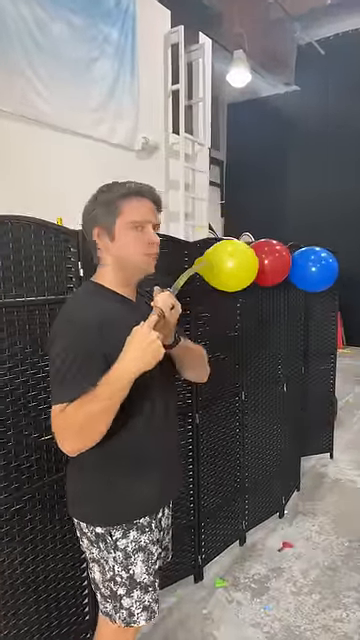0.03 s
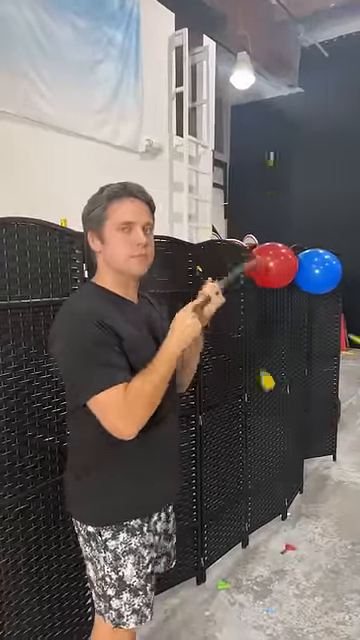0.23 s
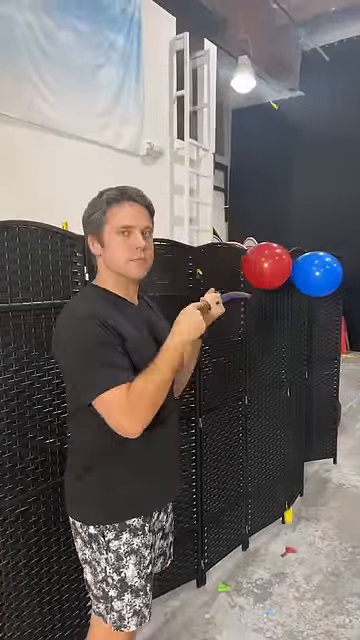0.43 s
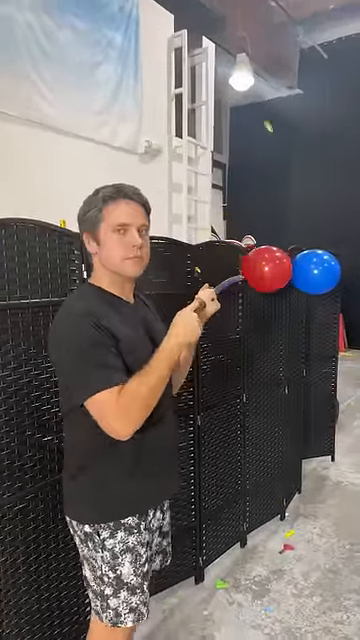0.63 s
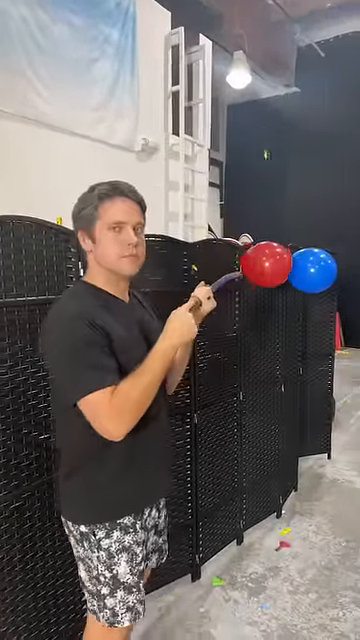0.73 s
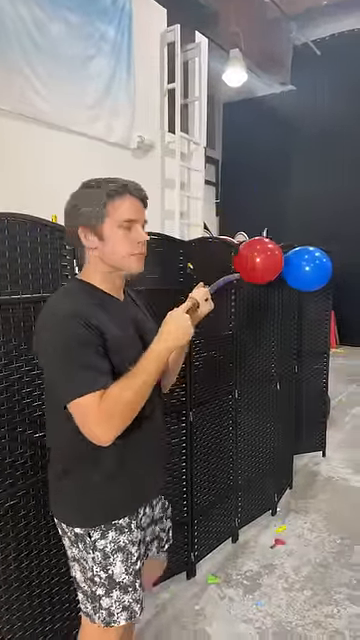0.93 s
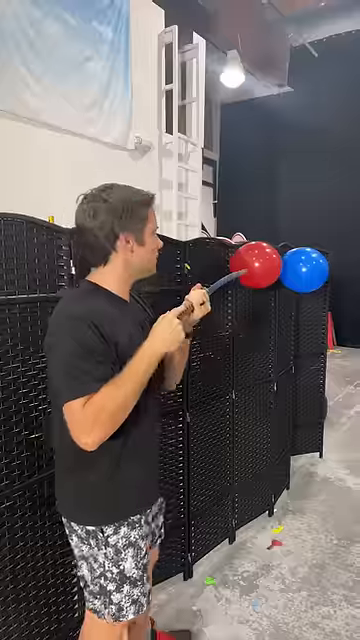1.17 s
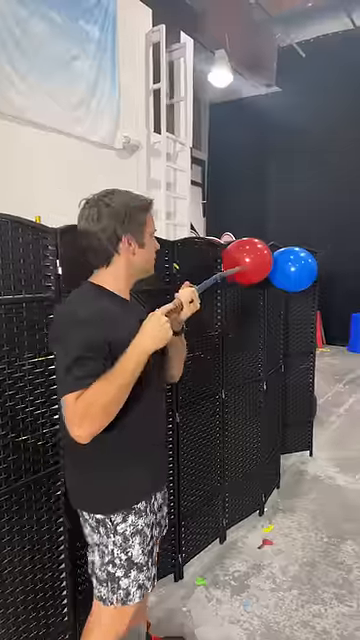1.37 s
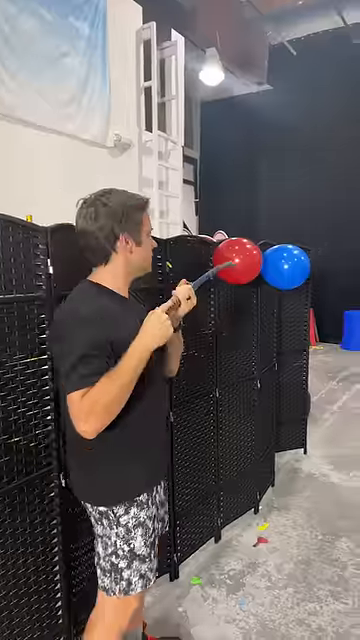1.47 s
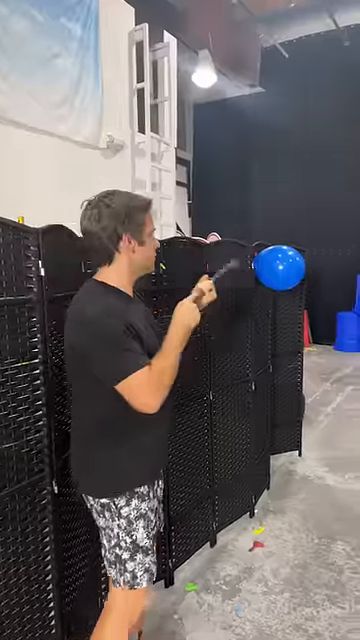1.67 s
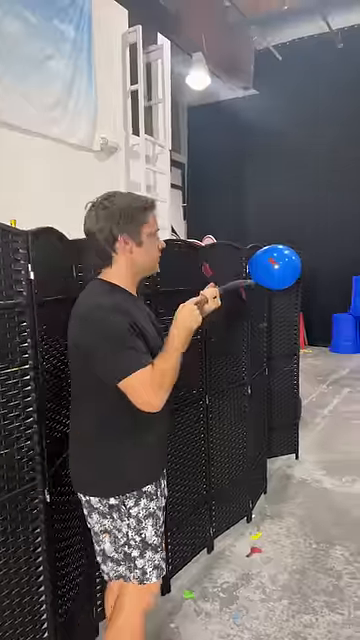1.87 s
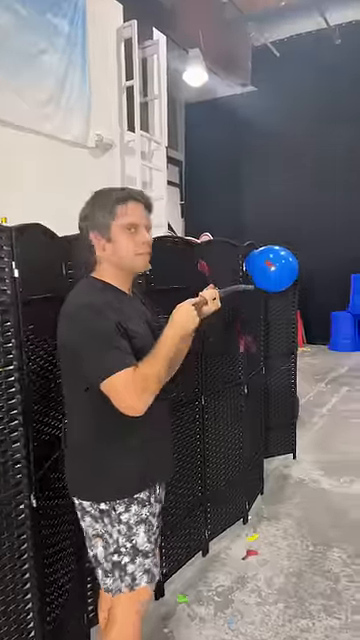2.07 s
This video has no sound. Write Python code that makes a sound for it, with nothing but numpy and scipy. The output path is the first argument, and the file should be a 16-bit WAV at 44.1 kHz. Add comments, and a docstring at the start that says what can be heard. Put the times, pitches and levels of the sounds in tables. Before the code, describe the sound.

Two balloons burst one after the other, with long echoes in a big room.

```python
"""A faint mains hum fills a large, hard hall; then two party balloons are pricked, a few steps away.
Each skin splits, rips in about ten milliseconds and lets its air thump outward. Near walls slap
the bang back and the hall rings on. Between the two bursts come a small flick and a faint rustle.
The recorder turns itself down at each bang and slowly comes back up."""
import sys
import numpy as np
from scipy import signal
from scipy.fft import rfft, irfft, next_fast_len
from scipy.io import wavfile
from scipy.ndimage import uniform_filter1d, minimum_filter1d, map_coordinates

SR = 44100
rng = np.random.default_rng(int(sys.argv[2]) if len(sys.argv) > 2 else 0)


def dump(signal):
    """Clip the signal to [-1, 1] and save it as 16-bit WAV at the path in sys.argv[1]."""
    limited = np.clip(np.atleast_2d(signal).T, -1, 1)
    pcm = np.round(limited * 32767).astype(np.int16)
    wavfile.write(sys.argv[1], SR, pcm)


N = 92610

# The two bursts, one row per balloon. Columns: start_s, rip_length_s, rip_db, split_db,
# thump_hz, thump_db, floor_db, scatter_db, hall_db
BALLOONS = [(0.2285, 0.006, -2, -17.5, 407, -13, -19.5, -11, -7),
            (1.7042, 0.0081, -5, -28, 231, 0.5, -14, -14, -13)]
RIP_RISE_S, RIP_FADE_S = 0.00099, 0.015  # every fade time is the time taken to drop by 60 dB
NEAR_ECHO_FADE_S = 0.023


def amp(db):
    """Turn decibels into a number to multiply by."""
    return 10 ** (np.asarray(db) / 20)


def along(points, hz):
    """Read between (pitch_hz, value) points on a logarithmic pitch scale."""
    pitches, values = np.transpose(points)
    return np.interp(np.log(hz + 1), np.log(pitches + 1), values)


def since(start_s):
    """Seconds since start_s, for every sample; negative before it."""
    return np.arange(N) / SR - start_s


def filtered(sound, gain_at):
    """Scale each frequency in a sound by gain_at(hz)."""
    size = next_fast_len(N + 8192)
    hz = np.fft.rfftfreq(size, 1 / SR)
    return irfft(rfft(sound, size) * gain_at(hz), size)[:N]


def noise(colour, strength=1):
    """Noise of average (rms) size 1; its colour says how strong each pitch is next to the others."""
    hiss = strength * rng.standard_normal(N)
    shaped = filtered(hiss, lambda hz: amp(along(colour, hz)))
    return shaped / shaped.std()


def wobble(turns_per_s):
    """A smooth curve through random points."""
    return map_coordinates(rng.standard_normal(N // 8), [np.arange(N) * turns_per_s / SR], mode="wrap")


def lumpy_noise(colour, lumps_per_s, depth_db):
    """Noise that comes in random lumps."""
    return noise(colour, strength=amp(depth_db * wobble(lumps_per_s)))


def fade(t, fade_s):
    """Stay at 1 until t = 0, then die away."""
    return np.exp(-np.log(1000) * np.maximum(t, 0) / fade_s)


def swell(start_s, rise_s, length_s, fade_s):
    """Rise, hold until length_s after the start, then die away."""
    t = since(start_s)
    return np.clip(t / rise_s, 0, 1) * fade(t - length_s, fade_s)


def hum_and_air():
    """Mains electricity hums over the low murmur of the air."""
    # The steady tones of the hum. Columns: pitch_hz, level_db
    hum_tones = [(59.2, -57.5), (118.4, -62), (236.9, -79), (355.3, -81)]
    # The colour of the murmuring air. Columns: pitch_hz, level_db
    air_colour = [(20, -13), (60, -2), (140, 1), (300, -5.5), (600, -20.5), (1200, -27.5), (4000, -46.5),
                  (10000, -44), (12500, -58), (16000, -65.5)]
    hum = sum(amp(db) * np.sqrt(2) * np.sin(2 * np.pi * (hz * since(0) + rng.random()))
              for hz, db in hum_tones)
    return hum + amp(-66) * noise(air_colour)


def burst(start_s, length_s, rip_db, split_db, thump_hz, thump_db, rip_colour):
    """The skin splits, then rips apart in jerks; the freed air swings back and forth a few times."""
    # The colour of the first split in the rubber. Columns: pitch_hz, level_db
    split_colour = [(30, -31), (200, -3), (600, 5), (2500, -5.5), (5500, 0), (8200, -9), (9500, -18.5),
                    (16000, -36)]
    t = since(start_s)
    # A backwards fade: the split grows, then runs for 5 ms before the skin lets go.
    growth = fade(-since(start_s - 0.005), fade_s=0.024)
    split = growth * (t < 0) * noise(split_colour)
    jerks = lumpy_noise(rip_colour, lumps_per_s=500, depth_db=2)
    rip = swell(start_s, RIP_RISE_S, length_s, RIP_FADE_S) * jerks
    air_swing = np.sin(2 * np.pi * thump_hz * t)
    thump = swell(start_s, rise_s=0.0057, length_s=0.0057, fade_s=0.038) * air_swing
    return amp(split_db) * split + amp(rip_db) * rip + amp(thump_db) * thump


def floor_bounce(start_s, colour, delay_s=0.0051):
    """The floor and the screens beside the balloon echo just behind the rip."""
    return swell(start_s + delay_s, RIP_RISE_S, length_s=0.015, fade_s=NEAR_ECHO_FADE_S) * noise(colour)


def scatter(start_s, colour, delay_s=0.0097):
    """Many early echoes from the walls and ceiling arrive in a lumpy cluster."""
    loudness = swell(start_s + delay_s, rise_s=0.022, length_s=0.0543, fade_s=NEAR_ECHO_FADE_S)
    return loudness * lumpy_noise(colour, lumps_per_s=1500, depth_db=1)


def wall_slaps():
    """Single walls throw the crack of each rip back."""
    # Separate wall echoes. Columns: balloon_index, delay_s, level_db (next to the rip), length_s
    wall_echoes = [(0, .0205, -0.5, .003), (0, .033, -5, 0.0049), (0, 0.069, -5, .003),
                   (0, 0.081, -4, 0.0013), (1, .02, -8.5, .004), (1, 0.073, -6, .001)]
    # The colour of a crack coming off a wall. Columns: pitch_hz, level_db
    slap_colour = [(30, -21), (150, -8.5), (500, 12.5), (1300, -1), (3300, -4.5), (4500, 5), (6000, -4),
                   (7800, -13.5), (10300, -17.5), (12300, -29), (16000, -30)]
    loudness = np.zeros(N)
    for balloon, delay_s, level_db, length_s in wall_echoes:
        start_s, _, rip_db = BALLOONS[round(balloon)][:3]
        loudness += amp(rip_db + level_db) * swell(start_s + delay_s, RIP_RISE_S, length_s, RIP_FADE_S)
    return loudness * noise(slap_colour)


def hall_ring(start_s, colour, delay_s=0.021, rise_s=0.033):
    """Countless echoes blend into the ring of the hall; the highest pitches die first."""
    # How long the hall rings at each pitch. Columns: pitch_hz, fade_s
    ring_times = [(60, 1.3), (200, 0.87), (420, 1.177), (640, 1.288), (900, 1.168), (1500, 1.293),
                  (3500, 1.24), (6000, 1.165), (10000, 0.76), (15000, .5)]
    hz, t, bands = signal.stft(noise(colour), SR, nperseg=512)
    fading_bands = bands * fade(t - start_s, along(ring_times, hz)[:, None])
    ring = signal.istft(fading_bands, SR, nperseg=512)[1][:N]
    return ring * np.clip(since(start_s + delay_s) / rise_s, 0, 1)


def far_echoes(start_s, width_octaves=0.8):
    """The ceiling sends back a blurred boom, and the far wall a dull swell."""
    # Echoes off big, far surfaces. Columns: delay_s, rise_s, fade_s, level_db (next to the ring), pitch_hz
    surfaces = [(.048, 0.0034, 0.044, -3, 270), (.42, 0.013, 1, -28, 537)]
    echoes = np.zeros(N)
    for delay_s, rise_s, fade_s, level_db, pitch_hz in surfaces:
        hiss = rng.standard_normal(N)
        rumble = filtered(hiss, lambda hz: np.exp(-.5 * (np.log2((hz + 1) / pitch_hz) / width_octaves) ** 2))
        loudness = amp(level_db) * swell(start_s + delay_s, rise_s, 2 * rise_s, fade_s)
        echoes += loudness * rumble / rumble.std()
    return echoes


def flick_and_rustle():
    """A small, crisp flick, perhaps a rubber scrap landing, dies away; a faint rustle follows."""
    # The flick, its ring in the hall, and the rustle. Columns: start_s, rise_s, length_s, level_db
    small_sounds = [(1.196, .005, 0.0065, -66), (1.21, 0.036, 0.044, -66.5), (1.42, 0.28, 0.35, -71.5)]
    # The colour they share. Columns: pitch_hz, level_db
    crisp_colour = [(300, 13), (2000, -20), (4500, 2), (8000, -3), (10500, 1), (12000, -15), (16000, -13)]
    loudness = sum(amp(level_db) * swell(start_s, rise_s, length_s, fade_s=0.49)
                   for start_s, rise_s, length_s, level_db in small_sounds)
    flicker_db = 2 * wobble(turns_per_s=160)
    return loudness * amp(flicker_db) * noise(crisp_colour)


def scene():
    """Both bursts with their echoes, and the flick and rustle between them, over the quiet hum."""
    # The colour of the ripping skin, one list per balloon. Columns: pitch_hz, level_db
    rip_colours = [
        [(30, -28.5), (150, 1.5), (300, 12), (560, 10), (950, 2), (1300, -10), (1800, -5), (3700, 1),
         (6000, -3.5), (7800, -11.5), (10300, -8), (12300, -27), (16000, -28)],
        [(30, -44), (150, 9.5), (300, -0.5), (520, 1), (950, 0.5), (1300, 4.5), (2300, -8), (3500, 0.5),
         (4500, -7.5), (5700, -1), (7600, -13.5), (10300, -4), (12300, -25), (16000, -21.5)],
    ]
    # The colour of the boom that fills the hall, one list per balloon. Columns: pitch_hz, level_db
    boom_colours = [
        [(30, -31), (70, -22), (130, -5), (280, -1.5), (550, 0), (900, -5.5), (1400, -11.5), (2000, -13),
         (2900, -7.5), (5500, -11.5), (7800, -16.5), (10300, -17), (12200, -29), (16000, -28.5)],
        [(30, -33), (70, -5), (130, 5), (280, 9), (550, 0), (850, -5.5), (1300, -0.5), (2000, -7), (2900, -10),
         (5500, -10), (7800, -15.5), (10300, -14.5), (12200, -24), (16000, -29)],
    ]
    mix = hum_and_air() + flick_and_rustle() + wall_slaps()
    for balloon, rip_colour, boom_colour in zip(BALLOONS, rip_colours, boom_colours):
        start_s, length_s, rip_db, split_db, thump_hz, thump_db, floor_db, scatter_db, hall_db = balloon
        mix += burst(start_s, length_s, rip_db, split_db, thump_hz, thump_db, rip_colour)
        mix += amp(floor_db) * floor_bounce(start_s, boom_colour)
        mix += amp(scatter_db) * scatter(start_s, boom_colour)
        mix += amp(hall_db) * (hall_ring(start_s, boom_colour) + far_echoes(start_s))
    return mix[None]


def automatic_volume(sound, limit_db=-17, cut_share=0.45, hold_s=0.38, recover_db_per_s=22):
    """The volume drops by a share of any level above the limit, holds, then climbs back."""
    power = uniform_filter1d(sound ** 2, size=882)  # averaged over 20 ms
    level_db = 10 * np.log10(np.abs(power) + 1e-12)
    cut_db = cut_share * np.minimum(limit_db - level_db, 0)
    half_hold = int(hold_s * SR / 2)
    held_db = minimum_filter1d(cut_db, 2 * half_hold + 1, origin=half_hold, mode="nearest")
    climb_db = recover_db_per_s * since(0)
    volume_db = np.minimum.accumulate(held_db - climb_db) + climb_db
    return sound * amp(volume_db)


def record(dry, peak_limit=0.92, lowest_hz=48, highest_hz=16000):
    """The recorder turns bangs down, rounds their peaks and loses the deepest bass and highest treble."""
    def pitch_range(hz):
        bass_cut = 1 / np.sqrt(1 + (lowest_hz / (hz + 1)) ** 8)
        treble_cut = np.clip((highest_hz - hz) / 300 + .5, 0, 1)
        return bass_cut * treble_cut

    turned_down = automatic_volume(dry[0])
    rounded = turned_down / (1 + (turned_down / peak_limit) ** 6) ** (1 / 6)
    return filtered(rounded, pitch_range)[None]


dry = scene()
out = record(dry)
dump(out)
```